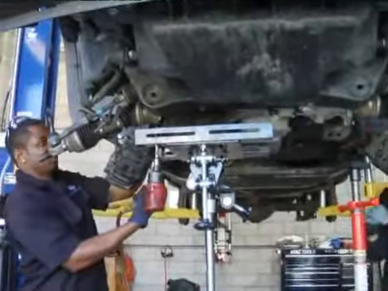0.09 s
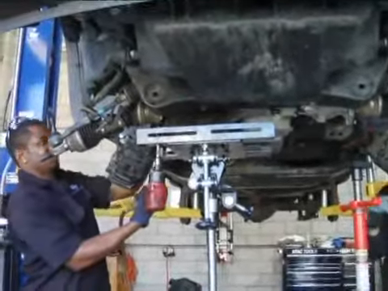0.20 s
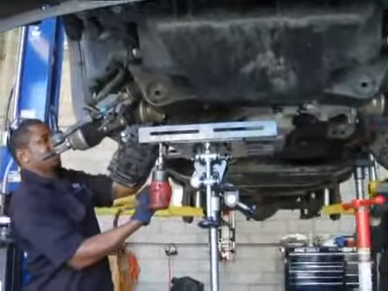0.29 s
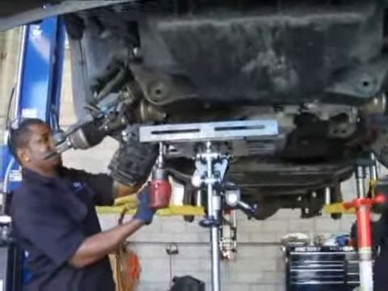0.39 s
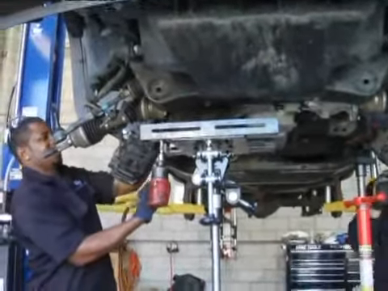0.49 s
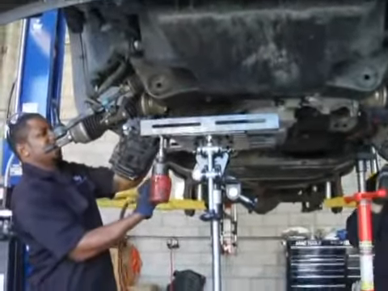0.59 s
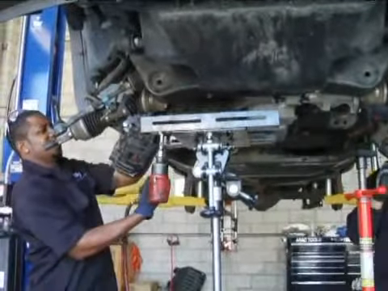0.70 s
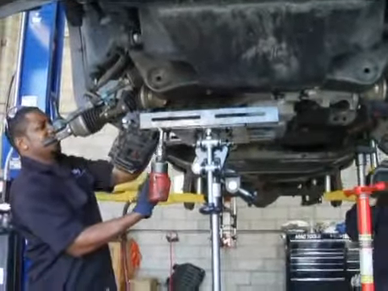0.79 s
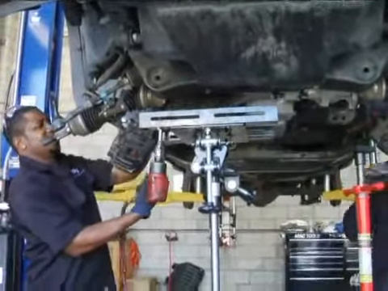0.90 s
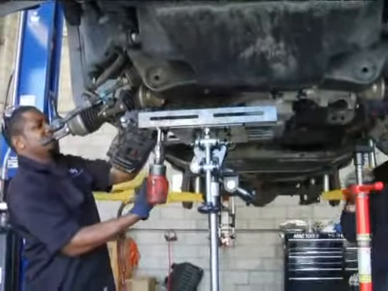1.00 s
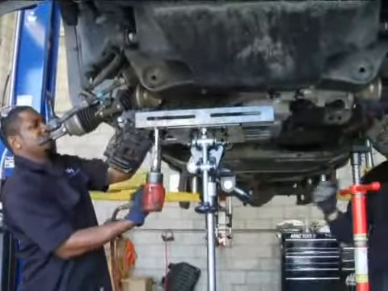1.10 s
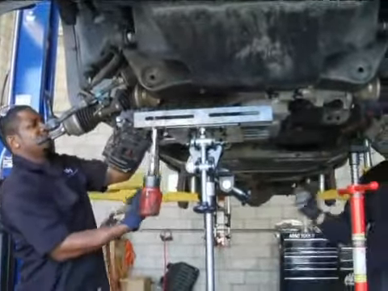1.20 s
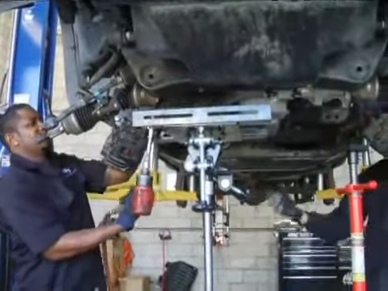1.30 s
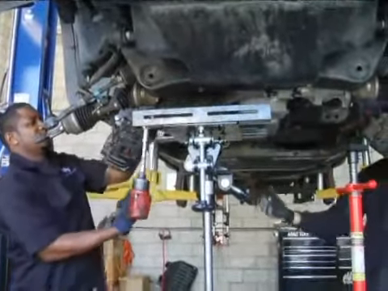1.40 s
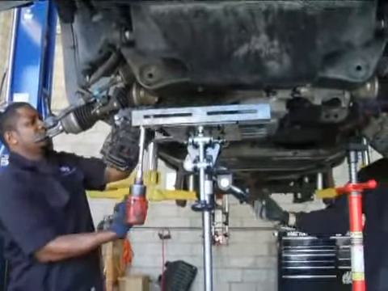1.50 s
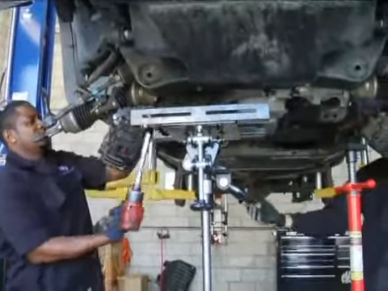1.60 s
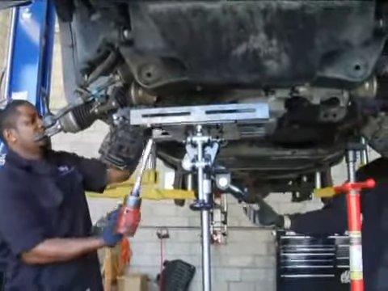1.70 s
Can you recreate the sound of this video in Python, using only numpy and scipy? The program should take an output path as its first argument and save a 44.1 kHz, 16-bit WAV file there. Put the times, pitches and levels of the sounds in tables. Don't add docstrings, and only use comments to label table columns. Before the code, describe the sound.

An air impact wrench hammers harshly for a moment, pauses, then whines up freely and winds down into ticks. Socket knocks, scrapes and light steel clinks follow, in a humming workshop heard fairly close, nearly mono.

```python
import sys
import numpy as np
from scipy import signal
from scipy.fft import rfft, irfft
from scipy.io import wavfile
from scipy.ndimage import uniform_filter1d

SR = 44100
rng = np.random.default_rng(int(sys.argv[2]) if len(sys.argv) > 2 else 0)


def generate_wav(signal):
    frames = np.transpose(np.atleast_2d(signal))
    scaled = np.clip(frames, -1, 1) * 32767
    pcm = np.round(scaled).astype(np.int16)
    wavfile.write(sys.argv[1], SR, pcm)


def decibels_to_gain(level_db):
    exponent = np.asarray(level_db, float) / 20
    return 10 ** exponent


N = 74970


def evened(x):
    return x / np.sqrt(np.mean(x ** 2) + 1e-20)


def read(points, hz):
    f, value = np.transpose(points)
    return np.interp(np.log(hz + 1), np.log(f + 1), value)


def colour(x, points):
    size = x.shape[-1]
    gain = decibels_to_gain(read(points, np.fft.rfftfreq(size, 1 / SR)))
    return irfft(rfft(x) * gain, size)


def noise(points, size):
    return evened(colour(rng.standard_normal(size), points))


def resonate(x, hz, width_hz):
    return signal.lfilter(*signal.iirpeak(min(hz, SR / 2.2), hz / width_hz, SR), x)


def strike(t, level_db, rise_s, t60_s):
    fade_db = 60 * np.maximum(t - rise_s, 0) / t60_s
    return np.minimum(t / rise_s, 1) ** 2 * decibels_to_gain(level_db - fade_db)


def add(mix, s, sound):
    part = mix[round(s * SR):][:len(sound)]
    part += sound[:len(part)]


# time in seconds, vane rate in Hz, exhaust level in dB, air level in dB.
LOADED = [
    (.215, 149.1, -31, -65.5),
    (.246, 185.7, -67, -29),
    (.25, 218.9, -47, -24.5),
    (.29, 238.1, -26, -29.5),
    (.305, 200.1, -38, -33),
    (.345, 233.2, -45, -28.5),
    (.39, 242.7, -39, -35),
    (.42, 194.2, -47, -45),
    (.5, 149.1, -36.5, -45),
]


def hammering_motor():
    return motor(LOADED, jitter=.25, spread_db=4)


# time in seconds, vane rate in Hz, exhaust level in dB, air level in dB.
FREE = [(.522, 181.8, -25, -30), (.545, 266.1, -31, -27), (.578, 402.9, -23, -31),
        (.6, 451.5, -26.5, -33.5), (.625, 524.2, -26, -35), (.643, 539.5, -23, -30.5),
        (.662, 500, -27.5, -39.5), (.688, 430, -21, -41), (.734, 319.9, -31.5, -41.5),
        (.772, 243, -32.5, -42.5), (.822, 192.8, -32.5, -40), (.876, 141.3, -32.5, -42.5),
        (.97, 104.4, -31.5, -47), (1.05, 81.1, -36.5, -60)]


def free_motor():
    return motor(FREE, jitter=.008, spread_db=1.2)


def motor(curve, jitter, spread_db):
    vanes, wobble = 6, .25
    seal_hz, most_leak = 240, .7
    s, hz, exhaust_db, air_db = np.transpose(curve)
    t = np.arange(N) / SR
    on = np.clip((t - s[0]) / .002, 0, 1) * np.clip((s[-1] + .04 - t) / .04, 0, 1)

    rate = np.exp(np.interp(t, s, np.log(hz)))
    unsteady = evened(uniform_filter1d(rng.standard_normal(N), size=200))
    turns = np.cumsum(rate * np.exp(jitter * unsteady)) / SR
    size = decibels_to_gain(spread_db * rng.standard_normal(2000))[turns.astype(int)]
    size = size * (1 + wobble * np.cos(2 * np.pi * turns / vanes))
    puffs = np.diff(np.floor(turns), prepend=0) * size * np.sqrt(SR / rate)
    leak = most_leak * np.clip(1 - rate / seal_hz, 0, 1)
    flow = (1 - leak) * puffs + leak * rng.standard_normal(N)

    pipe = exhaust(flow) + decibels_to_gain(-6) * (1 - leak) * np.cos(2 * np.pi * turns)
    pipe = decibels_to_gain(np.interp(t, s, exhaust_db)) * pipe
    hiss = decibels_to_gain(np.interp(t, s, air_db) + 8) * air_hiss(t, turns, size)
    return on * (pipe + hiss + decibels_to_gain(-70) * vane_ticks(t, puffs * size))


# pitch in Hz, width in Hz, level in dB.
EXHAUST = [(225, 95, 7), (316, 130, -1.5), (500, 244, 12.5), (1085, 210, 6)]
# pitch in Hz, width in Hz, level in dB.
TAILPIPE = [(1375, 165, 14), (1630, 130, 5)]


def exhaust(flow):
    pipe = np.zeros(N)
    for hz, width_hz, db in EXHAUST:
        pipe += decibels_to_gain(db) * resonate(flow, hz, width_hz)
    for hz, width_hz, db in TAILPIPE:
        once = resonate(flow, hz, width_hz)
        pipe += decibels_to_gain(db) * resonate(once, hz, width_hz)
    muffler = signal.butter(8, 1650, fs=SR, output='sos')
    return evened(signal.sosfilt(muffler, pipe))


# pitch in Hz, level in dB.
AIR = [(35, -58), (100, -14), (248, -19), (317, -6), (520, -4), (3290, -13.5), (7580, -18.5), (11900, -6.5),
       (13000, -32)]
# pitch in Hz, level in dB.
COASTING = [(9500, 1.5), (10500, -57), (12500, -17)]


def air_hiss(t, turns, size):
    gate, release_s = .26, .68
    opening = size * np.exp(-(turns % 1) / .34)
    hiss = noise(AIR, N) * (1 - gate + 2 * gate * opening)
    coast = np.clip((t - release_s) / .07, 0, 1)
    return (1 - coast) * hiss + coast * colour(hiss, COASTING)


def vane_ticks(t, taps):
    from_s, until_s, hz, width_hz = .68, 1.0, 9400, 900
    ticks = resonate(resonate(taps, hz, width_hz), hz, width_hz)
    return evened((t < until_s) * ticks * np.clip((t - from_s) / .064, 0, 1))


# start in seconds, level in dB.
BLOWS = [(.2495, -11), (.258, -21.5), (0.268, -15), (.274, -18.5), (0.305, -24), (.312, -20), (0.341, -18),
         (0.362, -20.5), (.378, -21), (0.517, -20.5), (0.526, -50), (.541, -11.5)]
# pitch in Hz, level in dB, 60 dB fade in seconds.
ANVIL = [(206, 1.5, 0.016), (409.4, -5.5, 0.096), (597, -1.5, 0.031), (900, 1.5, 0.0078),
         (2110, -24, 0.014), (5560, -28, 0.043), (6100, -20, 0.02), (7140, -3.5, 0.022)]


def hammer():
    scatter_hz, scatter_db = 70, 3
    out, t = np.zeros(N), np.arange(9000) / SR
    chance = rng.uniform(-1, 1, (len(BLOWS), len(ANVIL)))
    for (s, level_db), row in zip(BLOWS, chance):
        ring = np.zeros(len(t))
        for (hz, db, t60), d in zip(ANVIL, row):
            loudness = decibels_to_gain(level_db + db + scatter_db * d - 60 * t / t60)
            ring += loudness * np.sin(2 * np.pi * (hz + scatter_hz * d) * t + np.pi * d)
        add(out, s, np.minimum(t / .00043, 1) * ring)
    return out


# start in seconds, peak level in dB, pitch in Hz, 60 dB fade in seconds.
PINGS = [(.2485, -11, 200, 0.057), (.25, -26.5, 86.5, 0.068), (.297, -16.5, 87, 0.04),
         (.334, -22.5, 90, 0.068), (.3415, -15, 524, 0.038), (.2565, -13.5, 488, 0.035),
         (.2685, -22, 430, 0.047), (.273, -12, 500, 0.035), (.281, -24, 435, 0.07),
         (.304, -13.5, 254, 0.054), (.31, -19, 640, 0.043), (.317, -19, 446, 0.046),
         (.348, -16.5, 344, 0.028), (.363, -16, 830, 0.038), (.378, -20, 480, 0.049),
         (.395, -39, 500, 0.039), (.535, -18, 551, 0.24), (.548, -16, 682, 0.039),
         (1.1865, -29, 3250, 0.056), (1.187, -23.5, 1560, .02), (1.204, -40, 3440, 0.24),
         (1.206, -44, 5800, 0.11), (1.206, -42, 6670, 0.073), (.523, -14.5, 204.5, 0.14),
         (.527, -20.5, 72, .15), (.283, -20.5, 6930, .1), (.288, -19.5, 6260, 0.068),
         (.291, -19, 7870, 0.12), (.325, -20, 5700, .05), (.326, -21, 6250, 0.039), (.366, -22, 6880, 0.14),
         (.426, -25.5, 7000, 0.18), (.7607, -30, 9400, 0.018), (.8415, -42, 9040, .02),
         (.8724, -30, 9570, 0.01), (.886, -26, 9100, 0.0077), (.9168, -28, 9300, 0.01),
         (.926, -32, 8850, 0.011), (.9523, -30, 9440, .015), (.9717, -32, 9100, .015),
         (.9827, -31.5, 9150, .015), (.962, -38, 3040, 0.27), (1.019, -30.5, 2510, .05),
         (1.1858, -23.5, 2670, .09), (1.189, -18.5, 920, 0.012), (1.1905, -27, 2100, 0.015),
         (1.466, -31.5, 8850, 0.044), (1.478, -31.5, 685.4, 0.33)]


def pings():
    out, t = np.zeros(N), np.arange(9000) / SR
    for s, level_db, hz, t60 in PINGS:
        drift = evened(uniform_filter1d(rng.standard_normal(len(t)), size=60))
        cycles = hz * np.cumsum(1 + .035 * drift) / SR
        add(out, s, strike(t, level_db, .001, t60) * np.sin(2 * np.pi * cycles))
    return out


# start in seconds, level in dB, rise in seconds,
# 60 dB fade in seconds, main pitch in Hz.
KNOCKS = [(.218, -35.5, 0.0025, 0.028, 384), (.455, -31, 0.0037, 0.087, 500),
          (.94, -33.5, 0.055, 0.38, 223), (.961, -37.5, 0.0033, 0.35, 3100),
          (1.02, -39, 0.0025, 0.53, 1530), (1.021, -33.5, 0.0016, 0.18, 3130),
          (1.169, -46.5, 0.028, 0.61, 100), (1.05, -44, 0.03, 1.8, 610), (1.06, -46, 0.035, 0.43, 84),
          (0.22, -44.5, 0.0014, 0.068, 2610), (1.45, -51, .1, 1.7, 106), (.98, -38, 0.021, .4, 1500),
          (1.203, -28, 0.0061, .12, 790), (1.205, -35.5, 0.0015, 0.12, 2690),
          (1.226, -36.5, 0.0016, 0.22, 1390), (1.229, -41, 0.0016, 0.11, 2980),
          (1.438, -31, 0.027, 0.19, 1424), (1.467, -40, 0.0017, 0.044, 8400),
          (1.467, -39, 0.0029, 0.11, 2870), (1.47, -44, 0.027, .35, 660)]


def socket_knocks():
    ring_q, spill_db = 3.15, -4.5
    out, t = np.zeros(N), np.arange(24000) / SR
    for s, level_db, rise, t60, hz in KNOCKS:
        grit = rng.standard_normal(len(t)) * decibels_to_gain(2.4 * rng.exponential(1, len(t)))
        wide = resonate(grit, hz, hz)
        ring = evened(resonate(wide, hz, hz / ring_q)) + decibels_to_gain(spill_db) * evened(wide)
        add(out, s, strike(t, level_db, rise, t60) * ring)
    return out


# pitch in Hz, level in dB.
RATTLE = [(1000, -114), (3000, -32), (5000, 12), (8000, 4), (11000, 18), (13000, -3)]
# start in seconds, level in dB, rise in seconds,
# 60 dB fade in seconds.
RATTLES = [(0.514, -24, 0.0033, 0.069), (0.814, -33, 0.0017, 0.041), (.961, -46, 0.0017, 0.039),
           (1.018, -64, 0.0031, 0.11), (1.1867, -38, 0.0025, 0.096), (1.201, -28.5, 0.00098, 0.11),
           (1.366, -39, 0.0015, 0.026), (1.457, -36, 0.0012, 0.04), (1.47, -33, 0.00086, 0.038),
           (1.519, -29.5, 0.00046, 0.047), (1.62, -42, 0.0011, 0.016)]


def socket_rattles():
    out, t = np.zeros(N), np.arange(24000) / SR
    for s, level_db, rise, t60 in RATTLES:
        add(out, s, strike(t, level_db, rise, t60) * noise(RATTLE, len(t)))
    return out


# start in seconds, low note in dB, high note in dB.
CLINKS = [
    (1.517, -32, -40),
    (1.619, -32.5, -45),
]
# pitch in Hz, 60 dB fade in seconds.
BAR = [(3424, .2), (8904, .3)]


def bar():
    fade_power = 1.4
    out, t = np.zeros(N), np.arange(12000) / SR
    for s, *levels in CLINKS:
        ring = np.zeros(len(t))
        for db, (hz, t60) in zip(levels, BAR):
            ring += decibels_to_gain(db - 60 * (t / t60) ** fade_power) * np.sin(2 * np.pi * hz * t)
        add(out, s, np.minimum(t / .00097, 1) * ring)
    return out


# pitch in Hz, 60 dB fade in seconds.
SHOP = [(100, 0.54), (500, 0.59), (2000, 1), (6000, 0.99), (12000, 0.21)]


def shop(x):
    taps = np.zeros((2, SR))
    at = np.arange(300, SR - 20, 20) + rng.integers(0, 20, (2, (SR - 301) // 20))
    np.put_along_axis(taps, at, rng.choice([-1., 1.], at.shape), 1)
    hz, t, z = signal.stft(taps, SR, nperseg=256)
    fade = decibels_to_gain(-60 * t / read(SHOP, hz)[:, None])
    tail = signal.istft(z * fade, SR, nperseg=256)[1]
    return signal.fftconvolve(x[None], tail / np.linalg.norm(tail[0]), axes=1)[:, :N]


# pitch in Hz, level in dB.
HUM = [(30, -7.5), (90, -9), (190, -11.5), (600, -14), (2500, -21), (4000, -36.5), (6200, -31),
       (12000, -42.5)]


def hum():
    t = np.arange(N) / SR
    fan = evened(resonate(rng.standard_normal(N), 186.4, 7.9))
    level = decibels_to_gain(-46.5) + decibels_to_gain(-37 - 60 * t / .34)
    return noise(HUM, N) * level + decibels_to_gain(-47) * fan


# pitch in Hz, level in dB.
DIFFERENCE = [(100, -31), (1000, -24), (3000, -19), (6000, -22), (10000, -19), (12500, -10)]


def scene():
    whine = free_motor()
    tools = hammering_motor() + hammer()
    contacts = pings()
    socket = socket_knocks() + socket_rattles()
    to_room = tools + decibels_to_gain(-8) * whine + decibels_to_gain(-7) * socket + decibels_to_gain(-13) * contacts
    echo, side = shop(to_room)
    mid = tools + whine + socket + contacts + decibels_to_gain(-3) * echo + hum() + bar()
    side = colour(side, DIFFERENCE)
    return np.array([mid + side, mid - side])


def top_cut(x):
    return signal.sosfilt(signal.butter(12, 13000, fs=SR, output="sos"), x)


# pitch in Hz, level in dB.
MIC = [(30, -5.5), (70, 1.5), (9500, -3), (11500, -9), (13000, -11)]


def record(dry):
    heard = colour(dry, MIC)
    return top_cut(heard)


dry = scene()
out = record(dry)
generate_wav(out)
```